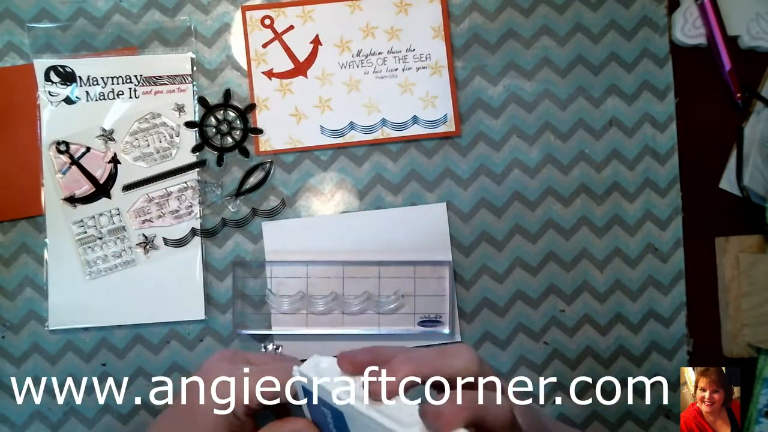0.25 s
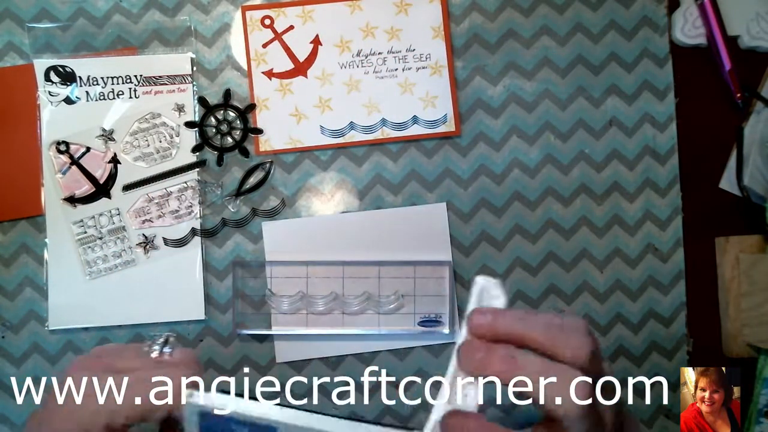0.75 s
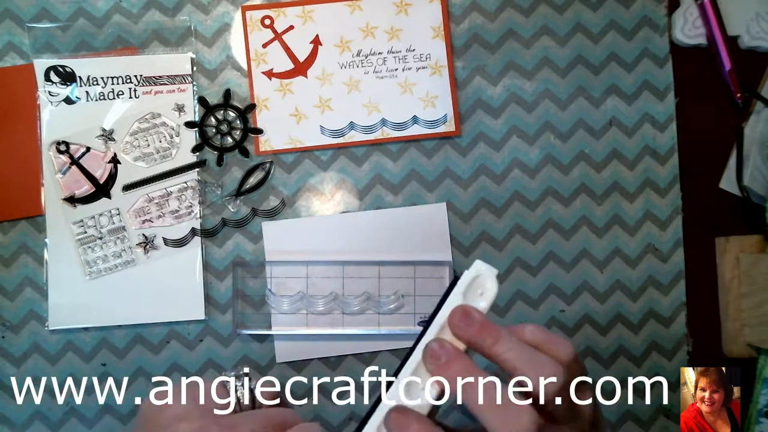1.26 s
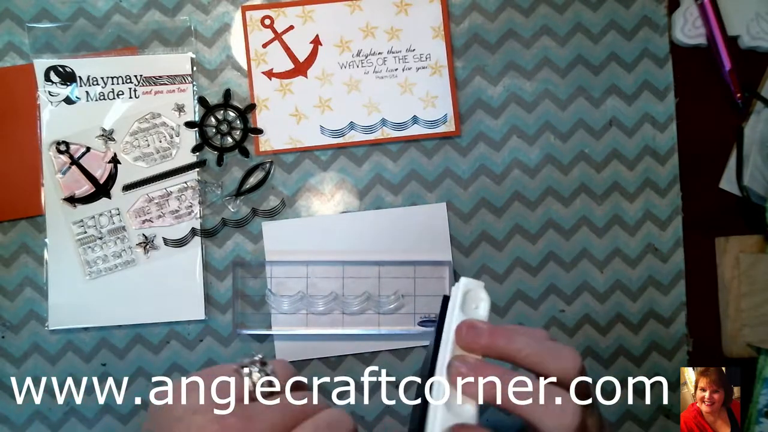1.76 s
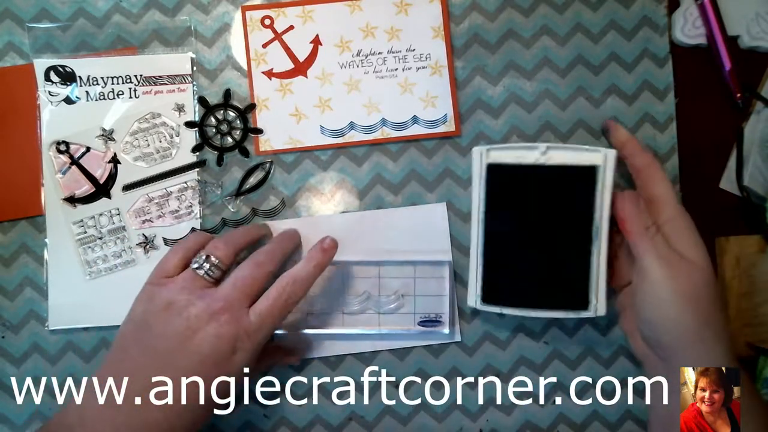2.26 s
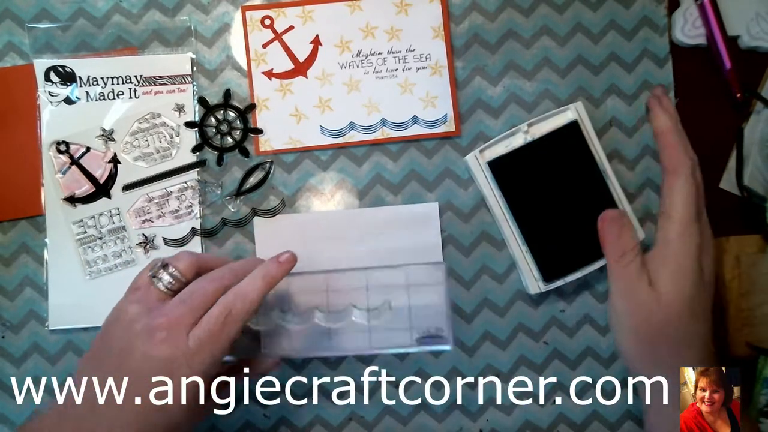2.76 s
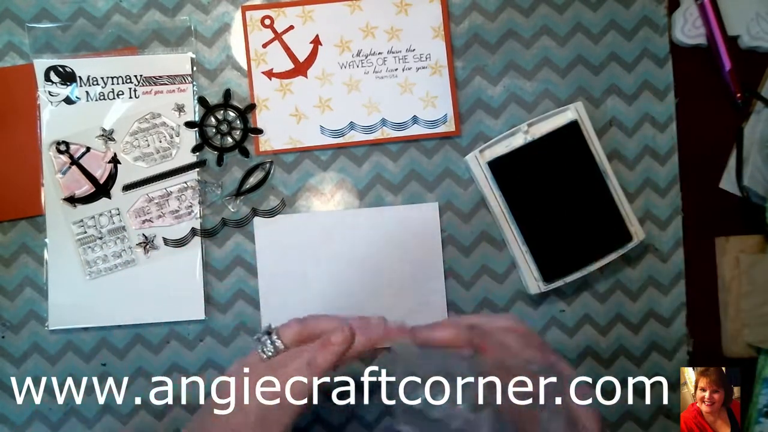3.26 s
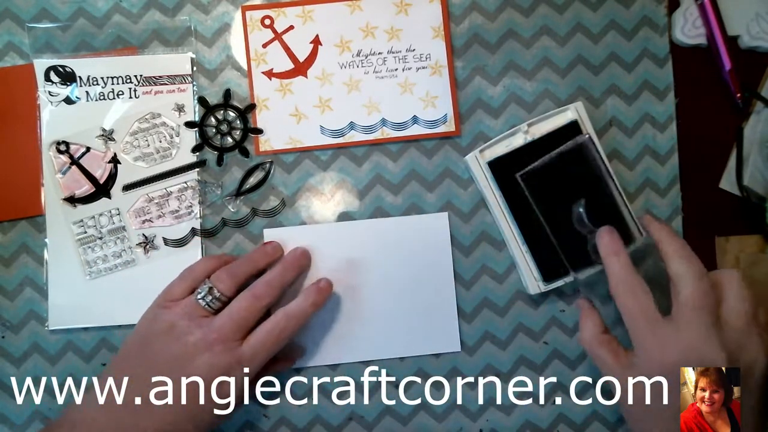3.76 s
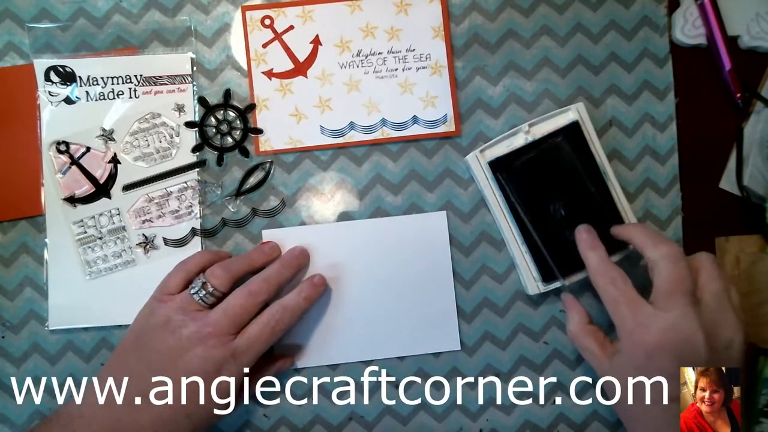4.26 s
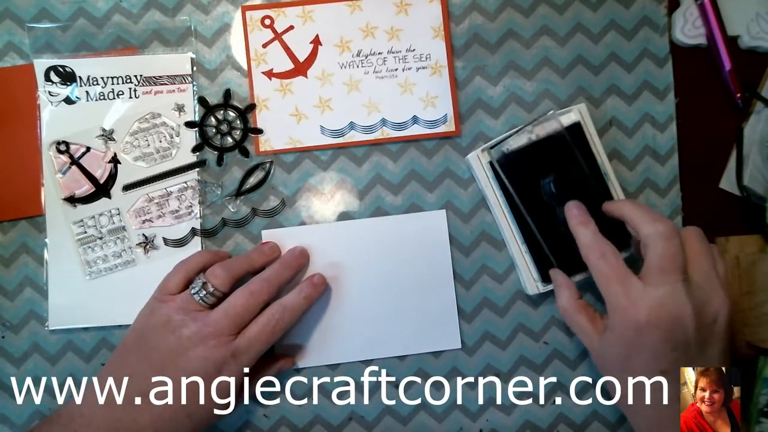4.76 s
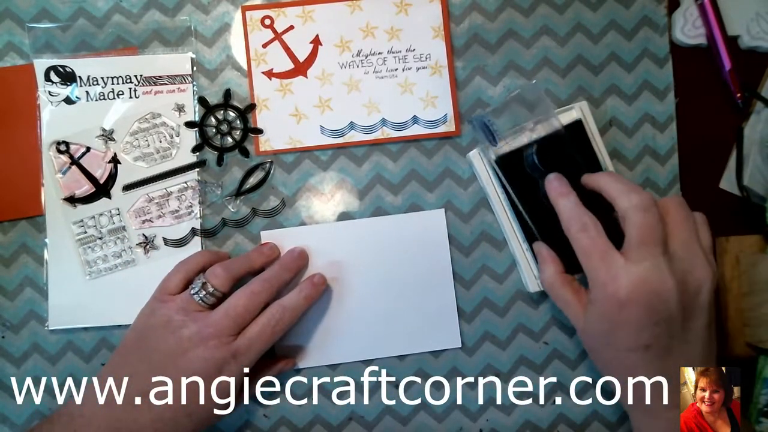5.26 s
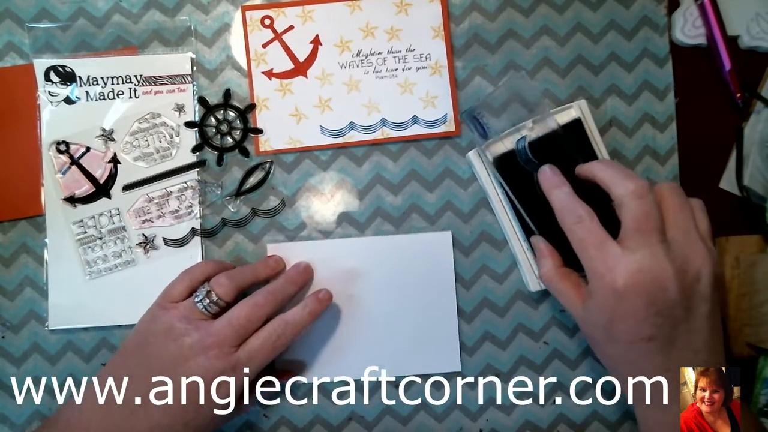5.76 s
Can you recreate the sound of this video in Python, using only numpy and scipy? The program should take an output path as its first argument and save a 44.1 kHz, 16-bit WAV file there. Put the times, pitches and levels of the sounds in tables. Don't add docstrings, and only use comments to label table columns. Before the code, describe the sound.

Close, dry plastic clicks and a loud clattering drop on a desk, then a few dull block taps and slaps above a very quiet fan.

```python
import sys
import numpy as np
from scipy import signal
from scipy.fft import rfft, irfft
from scipy.io import wavfile
from scipy.ndimage import uniform_filter1d

SR = 44100
rng = np.random.default_rng(int(sys.argv[2]) if len(sys.argv) > 2 else 0)


def ratio(d):
    e = np.asarray(d, float) / 20
    return 10 ** e


def digitize_waveform(pressure):
    field = np.atleast_2d(pressure).T
    bounded = np.clip(field, -1, 1)
    quanta = np.round(bounded * 32767).astype(np.int16)
    wavfile.write(sys.argv[1], SR, quanta)


N = 265437
T = np.arange(N) / SR


def unit(x):
    return x / np.sqrt(np.mean(x ** 2))


def band(x, hz, width):
    return signal.lfilter(*signal.iirpeak(hz, hz / width, fs=SR), x)


def add(out, s, x):
    i = int(s * SR)
    out[i:i + len(x)] += x[:N - i]


def decay(t, t60):
    return np.exp(-np.log(1000) * t / t60)


def patches(spread_db, hold, smooth):
    steps = np.repeat(rng.standard_normal(N // hold + 1), hold)[:N]
    return ratio(spread_db * uniform_filter1d(steps, size=smooth))


def grit(spread_db):
    return rng.standard_normal(N) * patches(spread_db, 40, 20)


# pitch_hz, level_db (per Hz)
FAN_AIR = [(25, -26), (55, -11.5), (85, -10.5), (150, 3.5), (220, -5), (300, -10.5), (600, -7.5),
           (1000, -9.5), (1500, -19), (2100, -21.5), (2600, -26.5), (4200, -30), (6000, -37.5),
           (16000, -46)]
# pitch_hz, width_hz, level_db
FAN_HUM = [(108.78, 5, -67), (300, 26, -76), (406.4, 4, -80.5), (495, 12, -80.5), (610.9, 21, -78),
           (950, 30, -83.5)]


def fan():
    hz, db = np.transpose(FAN_AIR)
    f = np.maximum(np.arange(N // 2 + 1) * SR / N, 1)
    colour = ratio(np.interp(np.log(f), np.log(hz), db))
    out = ratio(-68) * unit(irfft(rfft(rng.standard_normal(N)) * colour, N))
    for hz, width, db in FAN_HUM[1:]:
        out = out + ratio(db) * unit(band(rng.standard_normal(N), hz, width))
    hz, width, db = FAN_HUM[0]
    waver = unit(band(rng.standard_normal(N), hz, width))
    return out + ratio(db) * (np.sqrt(2) * np.sin(2 * np.pi * hz * T) + .25 * waver)


# start_s, length_s, level_db
SKIN = [(.39, 0.036, -86.5), (.634, 0.0174, -70.5), (.772, 0.018, -74), (1.24, 0.033, -77.5),
        (1.964, 0.114, -85), (3.162, .025, -80.5), (3.464, 0.0125, -81), (4.051, 0.072, -94),
        (4.33, .13, -89.5)]
SLEEVE = [
    (0, 0.0147, -67.5),
    (1.608, 0.025, -83.5),
    (1.814, 0.102, -85.5),
]
SIDES = [(.80, 0.0113, -79.5), (2.351, 0.085, -73.5), (2.422, 0.0482, -65), (3.309, 0.0304, -66),
         (3.343, 0.019, -65), (.39, 0.0277, -71.5), (1.615, 0.0182, -75.5)]
COVER = [
    (.796, 0.0223, -62.5),
    (.872, .02, -58),
    (2.408, 0.044, -63),
    (3.339, 0.0295, -70),
]
PAD = [
    (4.146, 0.0142, -44),
    (4.245, 0.0235, -55.5),
    (4.374, 0.034, -62.5),
    (4.641, .02, -54.5),
    (4.782, 0.0112, -59.5),
]
PAPER = [
    (2.891, 0.059, -67.5),
    (3.043, 0.064, -65),
]


def rubs():
    out, slips = np.zeros(N), grit(5.6)
    surfaces = [(SKIN, 8980, 2600), (SLEEVE, 2810, 15500), (SIDES, 3033, 545),
                (COVER, 1147, 370), (PAD, 811, 346), (PAPER, 512, 106)]
    for table, hz, width in surfaces:
        for s, length, db in table:
            piece = slips[int(s * SR):][:int(length * SR)]
            swell = np.sqrt(np.sin(np.pi * np.linspace(0, 1, len(piece)) ** 0.512))
            add(out, s, ratio(db) * unit(band(band(piece, hz, width), hz, width)) * swell)
    return out


def thump(blows, hz, t60, detune=0.011):
    out, t = np.zeros(N), T[:12000]
    for s, db in blows:
        tone = np.sin(2 * np.pi * hz * (1 + detune * rng.uniform(-1, 1)) * t)
        y = (1 - np.exp(-(t / .008) ** 2)) * decay(t, t60) * tone
        add(out, s, ratio(db) * y / np.abs(y).max())
    return out


# start_s, level_db
WRIST = [(.52, -54), (.939, -53), (1.368, -54), (1.524, -54), (1.773, -58.5), (2.085, -65), (3.221, -54),
         (3.624, -64), (3.81, -53), (3.964, -49.5), (4.618, -59.5), (4.669, -53)]
PANEL = [(1.27, -53.5), (2.079, -50.5), (2.162, -55.5), (2.515, -45), (2.529, -39.5), (2.752, -59.5),
         (3.63, -56), (5.783, -51), (5.793, -67)]
HOLLOW = [
    (4.141, -44),
    (4.243, -44.5),
    (4.617, -51),
    (4.628, -45.5),
    (4.760, -51.5),
]
# blows (start_s, level_db), pitch_hz, ring_s
LATCH = [
    ([(1.379, -37)], 2480, .125),
    ([(1.379, -39)], 2570, .115),
]


def thuds():
    out = thump(WRIST, 114, .085) + thump(PANEL, 292, .07) + thump(HOLLOW, 685, 0.0426)
    out += thump([(2.525, -48.5)], 110, .17) + thump([(2.53, -66.5)], 84, .15)
    out += sum(thump(*tone) for tone in LATCH)
    out += thump([(5.764, -42), (1.011, -45)], 990, 0.0275)
    return out + thump([(.385, -55), (.447, -64)], 1514, 0.02)


# start_s, level_db
SLIDE = [
    (0.766, -84),
    (.80, -60.5),
    (.822, -66.5),
    (.832, -53),
    (.885, -48),
    (.905, -53.5),
    (0.916, -54),
]
# pitch_hz, width_hz, level_db
RAIL_TONES = [
    [(1238, 380, 5), (2323, 350, -2.5), (3660, 1300, 4), (5065, 1940, -0.5)],
    [(6970, 3600, 15), (9030, 2600, 8.5), (11000, 1300, -13), (13400, 2500, -14.5)],
]


def slide():
    s, db = np.transpose(SLIDE)
    slips = grit(2.6)

    def rasp(tones):
        return unit(sum(ratio(g) * patches(2.5, 500, 300) * band(band(slips, hz, w), hz, w) for hz, w, g in tones))

    wall, edge = rasp(RAIL_TONES[0]), rasp(RAIL_TONES[1])
    treble_db = -6.5 + 0.33 * (np.interp(T, s, db) - max(db))
    return ratio(np.interp(T, s, db, -160, -160)) * (wall + ratio(treble_db) * edge)


def ring(modes, low_hz, high_hz, minor, echo_db, echo_t60, push, chance, noise, shut_s):
    detune, scatter_db, chatter, tint = 0.025, 3.0, 0.14, 1.6
    hz, db, t60 = np.transpose(modes)[:, :, None]
    t = T[:8192]
    blow = chatter * push * noise[0]
    blow[8] += 1
    loudest_hz = hz[db.argmax(), 0]
    hz = hz * (1 + detune * chance[0, :len(hz), None])
    gain = ratio(db + scatter_db * chance[1, :len(hz), None])
    body = (gain * decay(t, t60) * np.sin(2 * np.pi * hz * t)).sum(axis=0)
    echo = noise[2] + tint * band(noise[2], loudest_hz, loudest_hz * .3)
    edges = signal.butter(3, [low_hz, high_hz], "band", fs=SR, output="sos")
    struck = signal.fftconvolve(body, blow)[:len(t)]
    main, crowd, echo = signal.sosfilt(edges, [struck, push * noise[1], echo])
    y = main / np.abs(main).max() + minor * crowd / np.abs(crowd).max()
    fade = (1 - np.exp(-t / 0.0018)) * decay(t, echo_t60) * np.exp(-(t / shut_s) ** 5)
    return y / np.abs(y).max() + ratio(echo_db) * unit(echo) * fade


# pitch_hz, level_db, ring_s (time to fall 60 dB)
DESK = [(110, 2, 0.043), (160, -2.5, 0.023), (250, -3.5, 0.047), (393.3, -1.5, 0.06)]
TRAY = [(600, -12, 0.035), (676.94, 4.5, 0.048), (834, -6, .03)]
LID = [(996, -10.5, .02), (1224.7, 1, 0.027), (1338.8, -7.5, 0.01), (1670, -3.5, 0.018), (1836, -5.5, .015)]
WALL = [(2180, -11, 0.0038), (2590, 1, .014), (2870, 1, 0.034), (3140, 2.5, 0.02), (3440, 3, 0.021),
        (4074, -5.5, .008), (4730, -10, .008), (5100, -1.5, 0.01)]
EDGE = [(5910, 4, .004), (6860, 0, .004), (7390, -1.5, 0.012), (8080, -1.5, 0.012), (9253, 5, 0.006),
        (10440, -9, 0.008), (12300, -11.5, .003), (13700, -17, .003)]


def knocks(table, tray_db, lid_db, edge_db, desk_db, dulling, contact_ms, top_hz, free):
    parts = [(TRAY, 560, 950, 0.66, -21, 0.17), (LID, 980, 1900, 0.71, -22, 0.17),
             (WALL, 2000, 5500, 0.65, -26.5, 0.18), (EDGE, 5600, 11500, 2.1, -24.5, 0.13),
             (DESK, 150, 520, 0.4, -11, .2)]
    out, u = np.zeros(N), T[:8192] / (contact_ms / 1000)
    push = (1 - np.exp(-u / .1)) * np.exp(-u)
    hardest_db = max(row[1] for row in table)
    for s, wall_db, face_hz in table:
        noise, chance = rng.standard_normal((3, 8192)), rng.standard_normal((5, 2, 9))
        dull_db = dulling * (hardest_db - wall_db)
        share_db = tray_db + dull_db, lid_db + dull_db, 0, edge_db - dull_db, desk_db
        shut_s = max(.13 + .0027 * (wall_db + max(share_db)), .028)
        for (modes, *room), db, c in zip(parts, share_db, chance):
            face = [(face_hz, 10.5, .018)] if modes is WALL else []
            held = [(hz, g, t60 * free) for hz, g, t60 in modes + face]
            part_shut_s = shut_s * (.82 if modes is EDGE else 1)
            add(out, s, ratio(wall_db + db) * ring(held, *room, push, c, noise, part_shut_s))
    return signal.sosfilt(signal.butter(3, top_hz, fs=SR, output="sos"), out)


# start_s, level_db (peak of the walls), pitch_hz (struck face)
NAIL = [(.616, -68, 2880), (.6344, -68.5, 2380), (.7054, -66, 3460), (.7124, -69, 4010),
        (1.2502, -67.5, 3300), (1.6124, -60, 2420), (3.2694, -72, 4120), (3.4694, -76, 2720),
        (4.1405, -55.5, 3150)]


def nails():
    return knocks(NAIL, tray_db=-10.5, lid_db=-1, edge_db=5.5, desk_db=-31.5, dulling=0.123,
                  contact_ms=2.18, top_hz=11800, free=1)


RAIL = [
    (.7776, -62, 3580),
    (.829, -45, 4070),
    (.8861, -35.5, 3970),
    (1.004, -44.5, 3020),
]
CLICK = [
    (.9126, -23.5, 2837),
    (1.0108, -35.5, 2715),
]


def rail_knocks():
    catches = knocks(RAIL, tray_db=-39.5, lid_db=-19, edge_db=-8, desk_db=-41, dulling=.05,
                     contact_ms=4.2, top_hz=8100, free=.9)
    return catches + knocks(CLICK, tray_db=-28, lid_db=0.05, edge_db=-5.5, desk_db=-28.5, dulling=0.413,
                            contact_ms=2.71, top_hz=9100, free=1)


TAP = [
    (4.1405, -25.5, 3191),
    (4.6813, -31, 3139),
    (4.7586, -40.5, 2810),
]
TOUCH = [(4.127, -57.5, 2540), (4.148, -48.5, 2600), (4.245, -57, 3280), (4.371, -59, 3000),
         (4.672, -62.5, 3220), (5.775, -48.5, 2700)]
SLAP = [
    (4.3839, -29.5, 2580),
    (5.7643, -27, 2664),
]


def stamp():
    taps = knocks(TAP, tray_db=-15.5, lid_db=-11, edge_db=-26.5, desk_db=-33.5, dulling=0.334,
                  contact_ms=2.89, top_hz=4430, free=1.18)
    touches = knocks(TOUCH, tray_db=2.76, lid_db=3.1, edge_db=-32.5, desk_db=-34, dulling=-0.13,
                     contact_ms=6.2, top_hz=3300, free=0.87)
    return taps + touches + knocks(SLAP, tray_db=-23, lid_db=-19, edge_db=-34, desk_db=-31, dulling=.2,
                                   contact_ms=2.15, top_hz=4360, free=1.1)


SNAP = [
    (1.3744, -12, 2637),
]
FLIP = [
    (.388, -51, 2600),
    (2.0797, -8, 2909),
    (2.1357, -16.5, 2820),
]
SEAT = [
    (2.163, -12, 4560),
    (2.2226, -18.5, 3910),
    (2.2328, -22, 3080),
]


def lid_knocks():
    snap = knocks(SNAP, tray_db=-22, lid_db=0.3, edge_db=-3.5, desk_db=-30, dulling=.2,
                  contact_ms=2.4, top_hz=14000, free=1.7)
    flip = knocks(FLIP, tray_db=-35.5, lid_db=-9.5, edge_db=-10.5, desk_db=-32, dulling=0.235,
                  contact_ms=1.82, top_hz=8300, free=0.922)
    return snap + flip + knocks(SEAT, tray_db=-12, lid_db=-8, edge_db=-11.5, desk_db=-36, dulling=0.435,
                                contact_ms=2.565, top_hz=8740, free=0.574)


DROP = [
    (2.5142, 0.00533, 4040),
]
BOUNCE = [
    (2.531, -15.5, 3220),
    (2.541, -14, 4027),
    (2.547, -16.5, 2668),
    (2.560, -20, 2906),
    (2.569, -28.5, 3170),
    (2.579, -32.5, 2490),
]


def drop():
    hit = knocks(DROP, tray_db=-12.5, lid_db=-12.5, edge_db=-6.5, desk_db=-30, dulling=.15,
                 contact_ms=2.6, top_hz=18000, free=1.3)
    return hit + knocks(BOUNCE, tray_db=-11, lid_db=-9.5, edge_db=-6.5, desk_db=-29, dulling=.3,
                        contact_ms=2.6, top_hz=7500, free=.7)


def scene():
    handling = rubs() + thuds() + slide()
    hard_knocks = nails() + rail_knocks() + stamp() + lid_knocks() + drop()
    return (fan() + handling + hard_knocks)[None]


def band_limit(x):
    return signal.sosfilt(signal.butter(12, 16460, fs=SR, output="sos"), x)


def record(dry):
    rounded = np.tanh(1.1056 * dry) / 1.1042
    x = signal.sosfilt(signal.butter(2, 45, "high", fs=SR, output="sos"), rounded)
    x = signal.sosfilt(signal.butter(6, 14300, fs=SR, output="sos"), x)
    return band_limit(x)


dry = scene()
out = record(dry)
digitize_waveform(out)
```